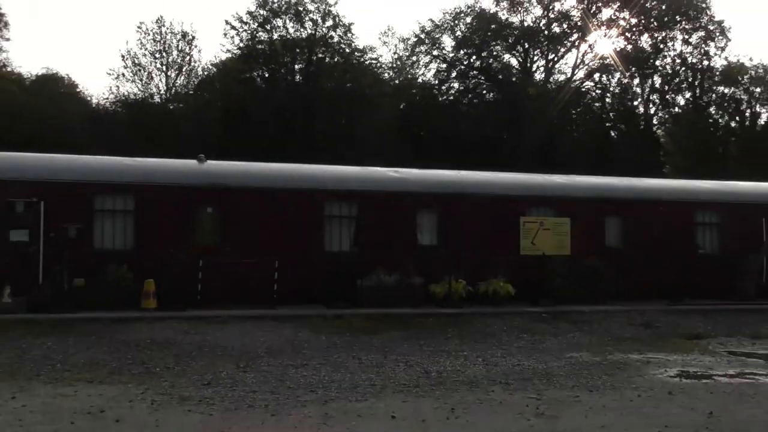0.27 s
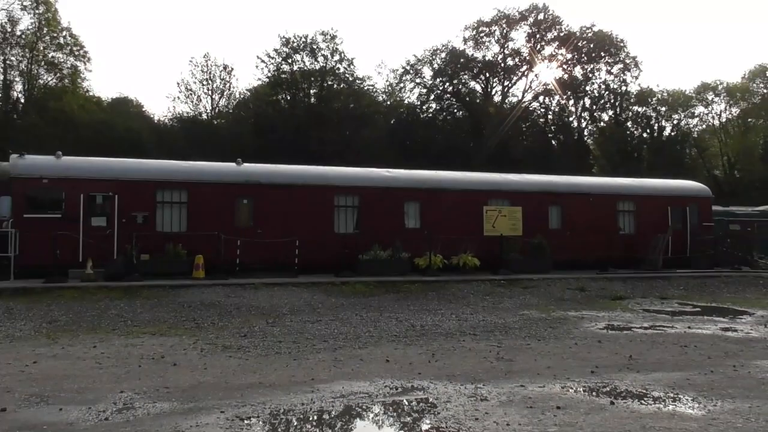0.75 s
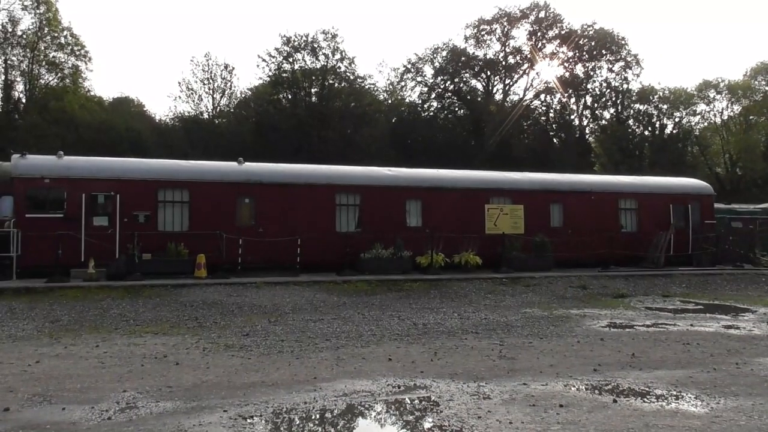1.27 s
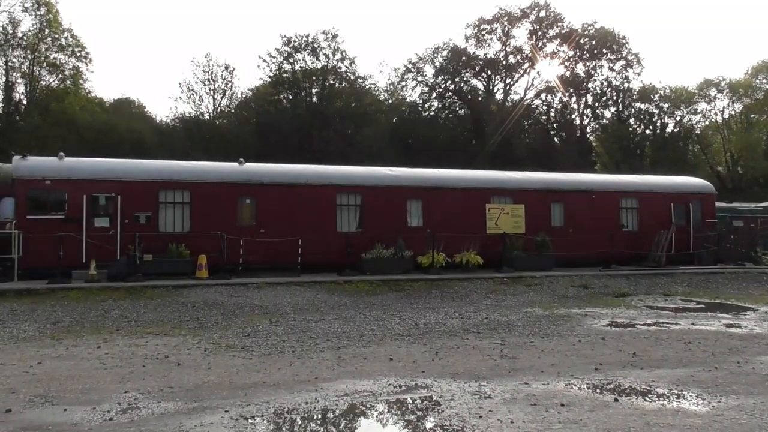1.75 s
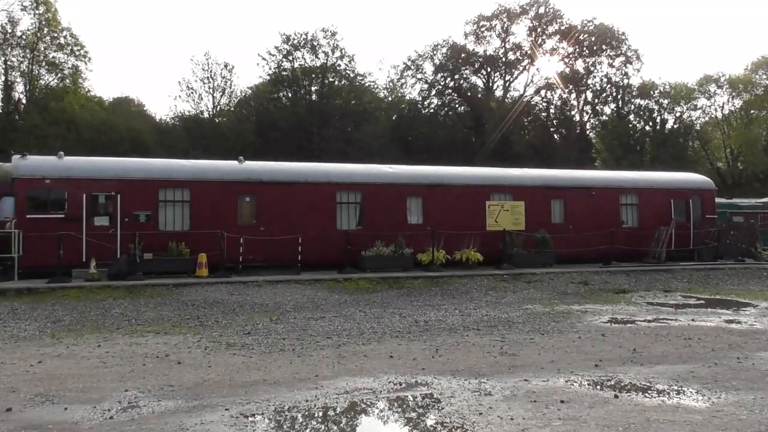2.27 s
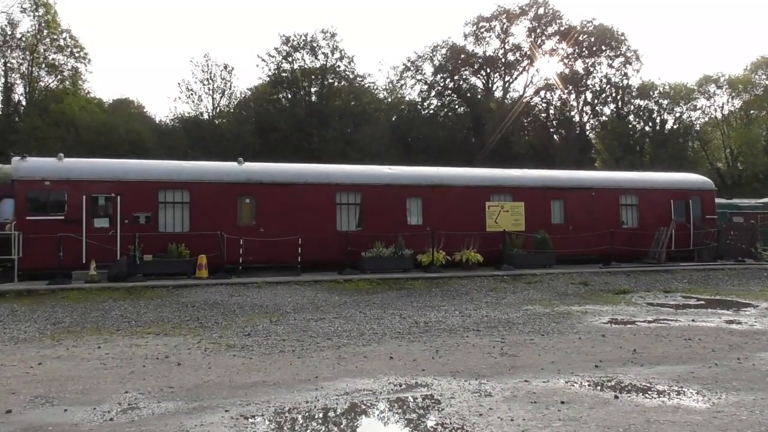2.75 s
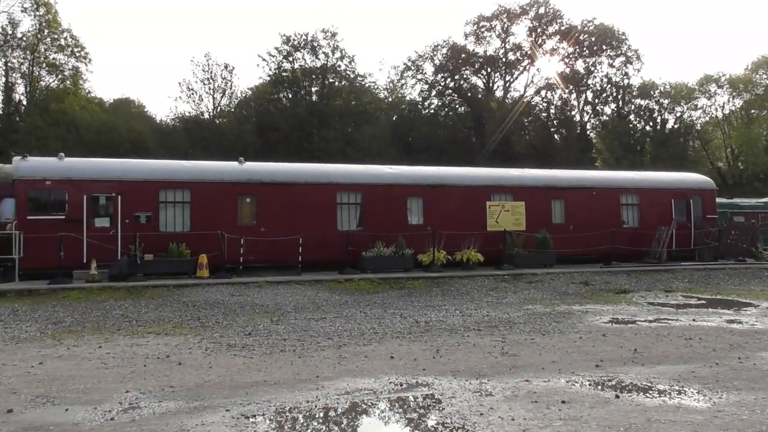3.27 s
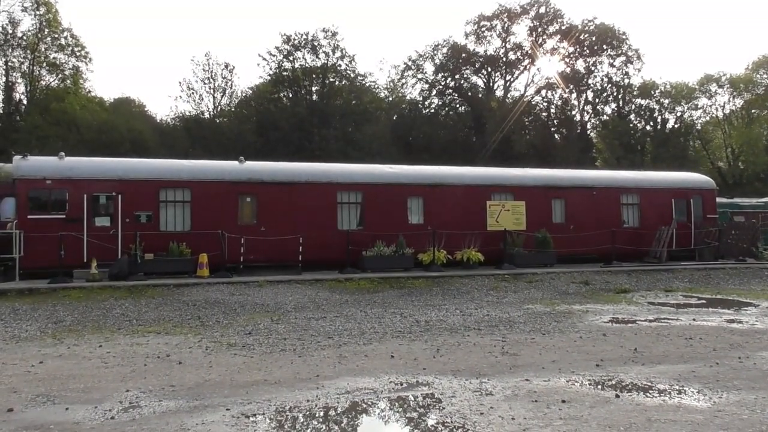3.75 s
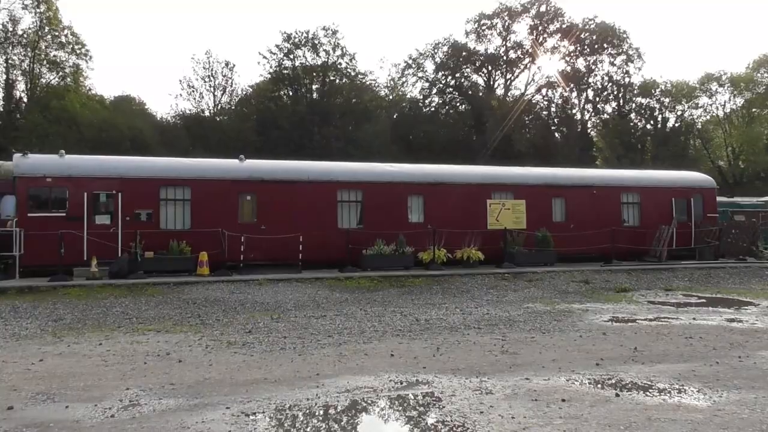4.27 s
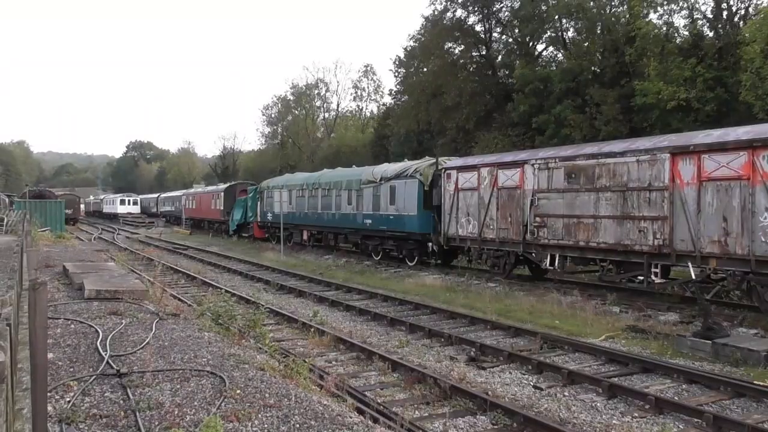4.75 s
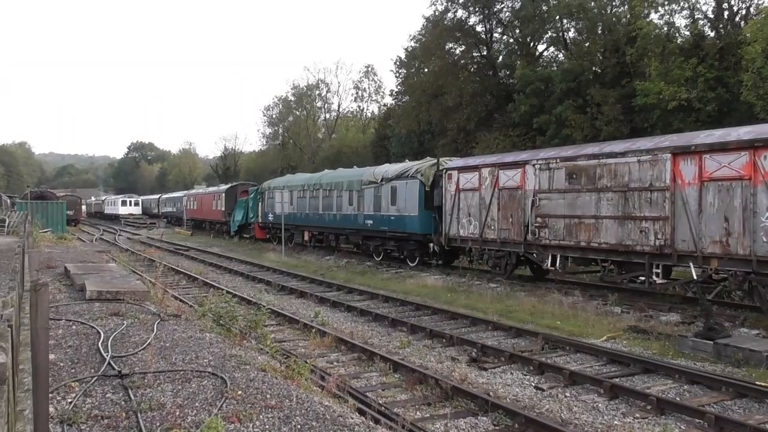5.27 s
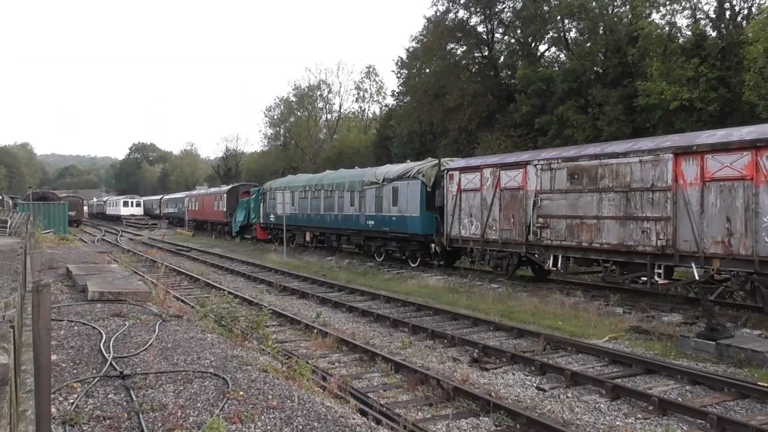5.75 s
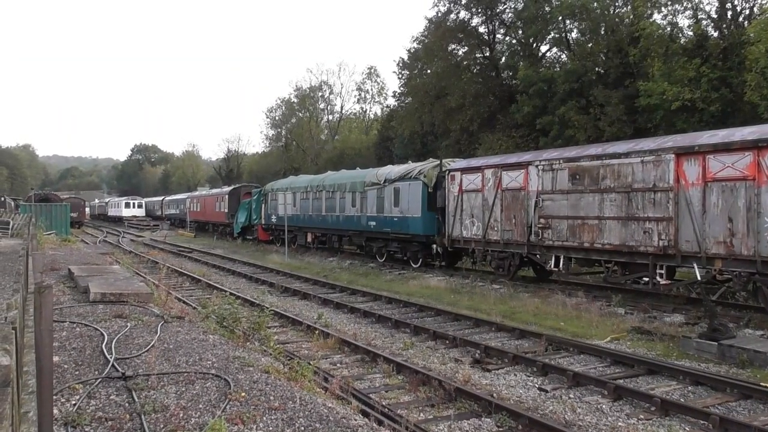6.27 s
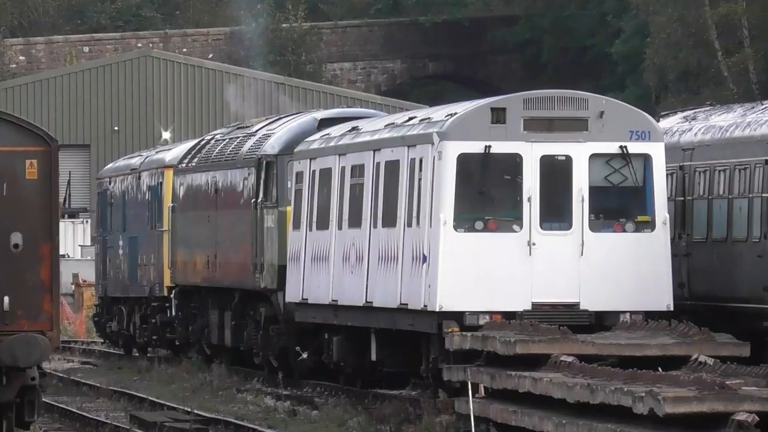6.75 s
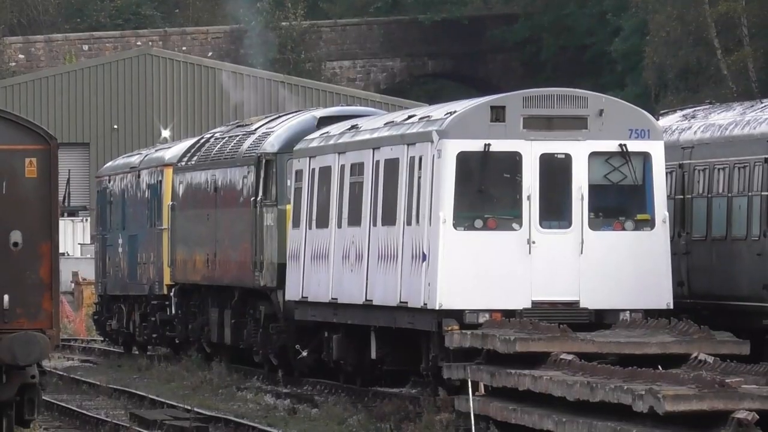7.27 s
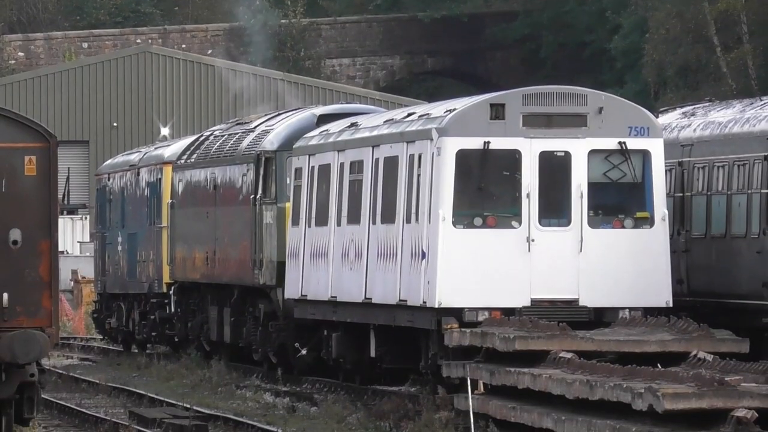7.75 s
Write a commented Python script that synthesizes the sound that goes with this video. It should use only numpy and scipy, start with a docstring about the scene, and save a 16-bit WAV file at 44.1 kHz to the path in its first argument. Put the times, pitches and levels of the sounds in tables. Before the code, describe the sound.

A large jet rumbles high over a railway yard while songbirds whistle and buzz, then cuts out to leave birdsong and faint distant traffic.

```python
"""A large jet rumbles high over a railway yard by a wood while songbirds whistle, warble and buzz in the trees.
Ticks sound under the jet; two cuts lead to quieter spots with birds, far traffic and a faint idling drone.
The jet is shaped noise combed by its ground echo; birds are bent sines and fast sweeps with echo and wood tail;
air and swells are band noise; the drone is two sines; ticks are short rings. Hiss lies over all."""
import sys
import numpy as np
from scipy import signal
from scipy.fft import rfft, irfft
from scipy.io import wavfile
from scipy.ndimage import uniform_filter1d

SR = 44100
rng = np.random.default_rng(int(sys.argv[2]) if len(sys.argv) > 2 else 0)


def wav_out(sig):
    """Save sig, one row per channel (or a flat mono array), as 16-bit PCM at SR to the path in sys.argv[1]."""
    wavfile.write(sys.argv[1], SR, np.round(np.clip(np.atleast_2d(sig).T, -1, 1) * 32767).astype(np.int16))


N = 352800
T = np.arange(N) / SR
BIN_HZ = np.fft.rfftfreq(N, 1 / SR)
OPPOSITE = np.array([[1], [-1]])  # left, right

# listening spots: start t/s, end t/s
SPOTS = [(0, 4.3843), (4.3963, 6.787), (6.787, 8)]


def undb(db):
    """Amplitude factor of a dB value."""
    return 10 ** (np.asarray(db) / 20)


def level(x, db):
    """Scale to an RMS level, all channels together."""
    return x * undb(db) / np.sqrt(np.mean(x ** 2))


def on_hz(table):
    """Read an (f/Hz, value) table at every spectrum bin, on a log frequency axis."""
    hz, value = np.transpose(table)
    return np.interp(np.log(BIN_HZ + 1), np.log(hz), value)


def noise(gain):
    """White noise with the given gain at every spectrum bin."""
    return irfft(rfft(rng.standard_normal(N)) * gain, N)


def hump(hz, width_hz):
    """Flat-topped band, width_hz between its 1/e gain points."""
    return np.exp(-(2 * (BIN_HZ - hz) / width_hz) ** 4)


def walk(rate_hz):
    """Random levels held 1 / rate_hz and smoothed twice; spread somewhat below 1."""
    k = int(SR / rate_hz)
    held = np.repeat(rng.standard_normal(N // k + 1), k)
    return uniform_filter1d(uniform_filter1d(held, k), k)[:N]


def shiver(count, size):
    """Noise smoothed twice over size samples; spread about 1."""
    smooth = uniform_filter1d(uniform_filter1d(rng.standard_normal(count), size), size)
    return np.sqrt(1.5 * size) * smooth


def gate(start_s, end_s, edge_s=.001):
    """1 between two times, with linear edges inside them."""
    return np.clip(np.minimum(T - start_s, end_s - T) / edge_s, 0, 1)


def per_spot(values):
    """Hold one value through each spot."""
    return np.select([T < stop for _, stop in SPOTS], values)


def next_cut(s):
    """End of the spot that holds or follows a time."""
    return min(stop for _, stop in SPOTS if stop > s)


def spot_gain(k):
    """A spot plays between its cuts; a brief faint swell sounds in the gap before the second."""
    swell_end_s, edge_s = 4.3937, .0003
    gap_start, gap_end = SPOTS[0][1], SPOTS[1][0]
    swell = ((T - gap_start) / (gap_end - gap_start)) ** 2 * gate(gap_start, swell_end_s, edge_s)
    return gate(*SPOTS[k], edge_s) + (k == 1) * swell


def add(out, start_s, x, pan_db):
    """Mix a short sound in at a time; pan_db is left minus right."""
    i = int(start_s * SR)
    out[:, i:i + len(x)] += undb(pan_db / 2 * OPPOSITE) * x[:N - i]


def air(k):
    """Air, far traffic and blurred far birds: a slowly drifting wash, narrow at 2.6-6.7 kHz, wide above 7.3 kHz."""
    # one spectrum per spot: f/Hz, relative level/dB per Hz
    spectra = [
        [(260, -26), (450, -2.5), (545, -6.5), (980, -8), (1460, -20.5), (2110, -20.5), (3010, -25.5),
         (4140, -26.5), (5220, -29.5), (6000, -24), (8050, -29), (9500, -41), (12400, -62), (20900, -120)],
        [(15, -18), (25, -7.5), (71, 2), (212, -3), (532, -13.5), (772, -10.5), (1710, -32), (1980, -30),
         (2880, -39.5), (3690, -37.5), (4860, -38.5), (7980, -32.5), (9500, -51), (12400, -41.5), (20900, -120)],
        [(15, -28), (25, 1), (146, 1.5), (532, -10), (587, -11), (649, -9.5), (896, -11), (1710, -33),
         (2030, -27.5), (2740, -34), (4080, -35.5), (4860, -32), (9500, -36), (12400, -51), (20900, -120)],
    ]
    # wash level per spot: level/dB
    wash_db = [-56.5, -49.5, -50]
    # stereo width: f/Hz, side minus mid/dB
    side_db = [(60, -12), (200, -9), (400, -6.5), (1000, -7), (1800, -12.5), (2600, -26), (6700, -36),
               (7300, -4)]
    # balance of the mid part: f/Hz, left minus right/dB
    balance_db = [(60, 2), (400, 1.5), (1300, 0.5), (2400, 0.7), (8000, 3.5)]
    colour, pan = undb(on_hz(spectra[k])), undb(on_hz(balance_db) / 2)
    mid = rfft(noise(colour))
    side = rfft(noise(colour * undb(on_hz(side_db))))
    sides = irfft(np.array([mid * pan + side, mid / pan - side]), N)
    return level(sides, wash_db[k]) * undb(.6 * walk(3))


def drone():
    """Far idling engine: an unsteady low hum that swells and dies back, and one thin, nearly steady tone."""
    # hum: t/s, level/dB
    hum_db = [(4.4, -57), (4.75, -63), (5.45, -53), (5.6, -66), (6.1, -59), (6.8, -64), (8, -70)]
    # tone per spot: level/dB
    tone_db = [-73, -69, -63]
    hum_hz, tone_hz = 46.2 + 2.49 * walk(9.2), 596 + 1.52 * walk(4)
    hum = np.sqrt(2) * np.sin(2 * np.pi * np.cumsum(hum_hz) / SR)
    hum *= undb(np.interp(T, *np.transpose(hum_db), left=-120))
    tone = np.sqrt(2) * np.sin(2 * np.pi * np.cumsum(tone_hz) / SR) * undb(per_spot(tone_db))
    return undb(1.1 * OPPOSITE) * (hum + tone)


def swells():
    """Soft bands of noise that fade, flicker and end with their spot."""
    # start t/s, end t/s, centre f/Hz, width/Hz, level/dB before fades and flicker
    swell_rows = [(0, 1.5, 41, 37, -54.5), (3, 4.5, 2010, 470, -76), (0, 0.52, 7200, 3500, -65.5),
                  (0.35, 0.48, 1500, 2300, -64), (2, 2.36, 3700, 2700, -67), (5.95, 6.5, 2600, 1700, -69.5),
                  (6.5, 7, 2570, 2100, -68.5), (5.5, 6.3, 4070, 1200, -73), (6.64, 6.9, 3800, 1728, -65)]
    out = np.zeros((2, N))
    for start, end, hz, width_hz, db in swell_rows:
        band = hump(hz, width_hz)
        flicker = undb(3 * walk(45))
        sides = level(noise(band) + 0.12 * noise(band) * OPPOSITE, db)
        out += sides * gate(start, end, 0.14) * flicker * (T < next_cut(start))
    return out


def ticks():
    """Small near ticks: a noise crack and three dull modes ringing a few milliseconds."""
    # t/s, level/dB before the envelope, share of the higher ring 0-1
    tick_rows = [(0.045, -43, 0.2), (.129, -46, 0.5), (.279, -53, 0.7), (0.523, -42.5, 0.2),
                 (1.729, -42, 0.05), (2.917, -47.5, .8), (3.313, -53, .8), (3.379, -51, .8),
                 (3.434, -50.5, .8), (3.497, -51, 1), (3.625, -50.5, 1), (3.689, -48, 1)]
    mode_hz, mode_spread = np.array([966, 1680, 2120]), 0.044
    out, t = np.zeros((2, N)), np.arange(int(.04 * SR)) / SR
    envelope = (1 - np.exp(-t / 0.00061)) * np.exp(-t / 0.0051)
    for s, db, share in tick_rows:
        hz = mode_hz * (1 + mode_spread * rng.standard_normal(len(mode_hz)))
        low, middle, high = np.sin(2 * np.pi * np.outer(hz, t))
        crack = 1.7 * uniform_filter1d(rng.standard_normal(len(t)), size=10) * np.exp(-t / 0.0072)
        ring = (1 - share) * low + share * (high + 0.45 * middle)
        add(out, s, undb(db) * (ring + crack) * envelope, -1.1)
    return out


def wood(x):
    """Trunks and leaves scatter a call into a short diffuse tail, wide in stereo only above 6.9 kHz."""
    t60_s, onset_s, wide_from_hz = 0.7, 0.015, 6900
    t = np.arange(int(.8 * SR)) / SR
    high_pass = signal.butter(8, wide_from_hz, "high", fs=SR, output="sos")
    wide = signal.sosfilt(high_pass, rng.standard_normal((2, len(t))))
    decay = np.exp(-np.log(1000) * t / t60_s) * np.clip(t / onset_s, 0, 1)
    tail = (rng.standard_normal(len(t)) + 0.79 * wide) * decay
    return signal.fftconvolve(x, tail / np.sqrt(np.sum(tail ** 2) / 2), axes=1)[:, :N]


def whistle(out, start_s, length_s, path_hz, db, pan_db, wobble_hz=0.):
    """Sine bent through three pitches, loudest mid-way; air and leaves flutter it; a warble saws its pitch."""
    edge_s, ends_db, warble_rate_hz = 0.00061, -5, 40
    flutter_db, flutter_hz = 4.6, 40
    clear_db, steady_s = -59, .06  # louder or longer-held notes flutter less
    t = np.arange(0, length_s, 1 / SR)
    u = 2 * t / length_s - 1  # -1 to 1 along the note
    first, mid, last = path_hz
    pitch = mid + (last - first) / 2 * u + ((first + last) / 2 - mid) * u ** 2
    pitch += wobble_hz * (1 - 0.65 * u) * (1 - 2 * (t * warble_rate_hz % 1))
    far = np.clip((clear_db - db) / 6, .35, 1)  # faint notes are far ones
    flutter = far * min(steady_s / length_s, 1) ** .45
    pitch += flutter * flutter_hz * shiver(len(t), size=150)
    fade = np.clip(np.minimum(t, length_s - t) / edge_s, 0, 1)
    gain = undb(db + ends_db * u ** 2 + flutter * flutter_db * shiver(len(t), size=170))
    add(out, start_s, np.sqrt(2) * fade * gain * np.sin(2 * np.pi * np.cumsum(pitch) / SR), pan_db)


def buzz(out, start_s, length_s, low_hz, high_hz, rate_hz, db, pan_db):
    """Falling sweeps, boosted at the throat's ring: fast and uneven ones rasp, slow ones trill evenly."""
    attack_s, release_s, sag_db = 0.0076, 0.016, -5.5
    throat_hz, throat_db = 6800, 2
    t = np.arange(0, length_s, 1 / SR)
    sweep_hz = rate_hz * (1 + rate_hz / 400 * shiver(len(t), size=200))
    phase = np.cumsum(sweep_hz) / SR % 1
    pitch = high_hz + (low_hz - high_hz) * phase ** 1.1
    pitch += 1.5 * rate_hz * shiver(len(t), size=40)
    shape = np.clip(np.minimum(t / attack_s, (length_s - t) / release_s), 0, 1)
    shape *= undb(sag_db * t / length_s) * np.sin(np.pi * phase) ** 0.087
    shape *= undb(1.9 * shiver(len(t), size=100))
    shape *= undb(throat_db * np.exp(-((pitch - throat_hz) / 500) ** 2))
    add(out, start_s, np.sqrt(2) * undb(db) * shape * np.sin(2 * np.pi * np.cumsum(pitch) / SR), pan_db)


def far_chorus():
    """Quick random chirps of far birds; low voices hold their notes, high ones bend and clip them."""
    # t/s, level/dB, middle pitch f/Hz
    chorus_rows = [(0, -66, 4160), (.35, -78, 4220), (.9, -72, 4110), (1.15, -73.5, 4110),
                   (1.65, -79, 4145), (1.9, -69, 4170), (2.6, -85, 4010), (3.3, -78, 4100),
                   (4.38, -76, 4090), (4.4, -68, 4310), (5.5, -67.5, 4100), (5.95, -77, 3640),
                   (6.03, -71, 2604), (6.4, -76, 2646), (6.5, -73.5, 3000), (6.78, -74, 3610),
                   (6.79, -67, 4200), (7.3, -70, 4105), (7.42, -86, 4130), (7.6, -79, 4160), (8, -73, 4220)]
    spread, bend = .25, 0.2826  # shares of the pitch
    held_hz = 3200
    far = np.zeros((2, N))
    times, chorus_db, chorus_hz = np.transpose(chorus_rows)
    for when, long, high, rise, fall, loud, side in rng.random((480, 7)):
        s = when * (N / SR - .05)
        hz = np.interp(s, times, chorus_hz) * (1 + spread * (high - .5))
        lively = np.clip((hz - held_hz) / 800, .1, 1)
        length_s = (.014 + .03 * long ** 2) * (2.5 - 1.5 * lively)
        length_s = min(length_s, next_cut(s) - s + .004)
        path_hz = hz * (1 - lively * bend * np.array([rise, 0, fall]))
        whistle(far, s, length_s, path_hz, -70 + 8 * loud, 1 - 2 * side)
    return level(far, 0) * undb(np.interp(T, times, chorus_db))


def couplets(out):
    """Two falling slurs, the low one first."""
    # start t/s, low slur level/dB, high slur level/dB
    couplet_rows = [(1.748, -66, -64), (1.852, -68, -65.5), (1.96, -67, -64.5), (2.062, -72, -65)]
    low_hz, high_hz = [2790, 2600, 2360], [5000, 4400, 3750]
    slur_s, gap_s, pan_db = 0.026, 0.025, -3  # gap from start to start
    for s, low_db, high_db in couplet_rows:
        whistle(out, s, slur_s, low_hz, low_db, pan_db)
        whistle(out, s + gap_s, slur_s, high_hz, high_db, pan_db)


def hooks(out):
    """Whistles that leap up and hold."""
    # start t/s, hold plus half the leap/s, top f/Hz, level/dB, left minus right/dB
    hook_rows = [(4.84, 0.019, 4100, -72, -9), (5.724, 0.018, 3990, -59, 2), (5.791, 0.011, 4020, -59, 2),
                 (5.859, 0.019, 3970, -55, -3.5), (7.492, .02, 4250, -72, 3),
                 (7.562, 0.023, 4080, -66.5, 1), (7.624, 0.0335, 4100, -66, 2),
                 (7.695, 0.031, 4060, -67, -1.5), (7.942, 0.032, 4370, -66, 2)]
    leap_hz, leap_s = 754, 0.0071
    for s, length_s, top_hz, db, pan_db in hook_rows:
        whistle(out, s, leap_s, top_hz - leap_hz * np.array([1, .35, 0]), db, pan_db)
        whistle(out, s + leap_s, length_s - leap_s / 2, [top_hz] * 3, db, pan_db)


def rasps(out):
    """A rasping call in two equal buzzes."""
    # start t/s, time to the second buzz/s, level/dB before shaping
    rasp_rows = [(.738, 0.077, -59), (1.219, 0.091, -69), (2.263, 0.073, -58), (2.841, 0.073, -63),
                 (3.168, 0.076, -62), (3.422, 0.076, -63.5)]
    length_s, low_hz, high_hz, rate_hz, pan_db = 0.075, 5900, 7500, 200, -1
    for s, wait_s, db in rasp_rows:
        for start_s in (s, s + wait_s):
            buzz(out, start_s, length_s, low_hz, high_hz, rate_hz, db, pan_db)


def near_birds():
    """All near calls, each with one early echo off the side of a carriage."""
    # start t/s, length/s, start f/Hz, middle f/Hz, end f/Hz, mid-note level/dB, left minus right/dB
    note_rows = [(.2, .08, 8000, 7800, 7400, -74, -5), (.285, 0.09, 7200, 6990, 6800, -69, 0),
                 (.344, 0.02, 3800, 4500, 5400, -60, -3), (.362, .016, 5220, 4750, 4340, -64, -3),
                 (.375, 0.048, 4070, 4075, 4020, -60, -5), (.392, 0.031, 4480, 4310, 4160, -63, -3),
                 (.427, 0.014, 4050, 3580, 3150, -57, -4), (.46, 0.084, 6740, 6730, 6660, -67, -1),
                 (.515, 0.015, 3200, 3650, 4050, -54.5, -5), (.541, 0.032, 3850, 3650, 3280, -54, -4),
                 (.527, .009, 4100, 4500, 4900, -62, -5), (.575, .017, 3850, 4000, 4240, -58, -5),
                 (.591, 0.012, 4100, 3600, 3130, -56, -4), (.626, 0.0087, 4300, 4480, 4500, -55, -3),
                 (.654, 0.027, 4800, 4200, 4070, -59.5, -4), (.678, 0.017, 3400, 4110, 4750, -53.5, -4),
                 (.699, .03, 4300, 4500, 4480, -59, -3), (.706, 0.039, 3600, 3510, 3380, -61, -4),
                 (.771, .01, 4030, 4440, 4900, -63, 0), (.782, .01, 4900, 5300, 5700, -68, -2),
                 (.8, 0.015, 4800, 4470, 4170, -61.5, -3), (.868, .016, 4500, 4350, 4150, -68, -1),
                 (.865, .015, 3700, 3640, 3520, -69, -3), (1.021, 0.061, 3900, 3830, 3750, -68, -1),
                 (1.631, 0.013, 2460, 2360, 2300, -65, -4), (1.643, 0.013, 3430, 4200, 4960, -65, -3),
                 (1.6, .027, 8120, 8010, 7900, -71.5, 6), (1.655, .135, 5830, 5810, 5790, -73.5, 1),
                 (1.775, .025, 7400, 7150, 6900, -68, 4), (1.95, .16, 8800, 8720, 8660, -78, 10),
                 (1.752, 0.027, 7030, 8160, 8600, -68, 5), (2.178, 0.02, 2560, 2435, 2280, -66, -6),
                 (2.202, 0.025, 4380, 4200, 3930, -61, 2), (2.232, 0.033, 4210, 4060, 3900, -59.5, 2),
                 (2.258, 0.047, 3900, 3080, 2600, -65, 3), (2.38, .015, 3400, 3480, 3560, -67, 5),
                 (2.395, .055, 3500, 2900, 2660, -73, 4), (2.53, 0.16, 3490, 3570, 3620, -72.5, -1),
                 (2.948, 0.043, 4230, 4190, 4200, -68, 0.5), (3.774, 0.11, 3940, 4050, 4200, -72.5, -2),
                 (4.02, 0.04, 5660, 5080, 5000, -68.5, -1), (4.111, 0.043, 5650, 5090, 5100, -64, 0),
                 (4.24, 0.083, 2060, 2045, 2030, -69, -1), (4.414, 0.062, 4640, 4140, 3900, -56, -4),
                 (4.479, .085, 5820, 5310, 5270, -65, -4), (4.484, .03, 6200, 6150, 6100, -64, -2),
                 (4.544, 0.049, 3170, 4530, 4800, -61.5, -5), (4.635, 0.051, 5000, 5070, 5100, -61, 0),
                 (4.679, 0.022, 5030, 3520, 5100, -59, -7), (4.702, 0.022, 5100, 5070, 5120, -58, -2),
                 (4.787, .009, 6400, 6300, 6250, -59, -1), (4.806, 0.0095, 6330, 6150, 5850, -60, -1),
                 (4.848, .012, 6270, 6270, 6300, -54, 0), (4.872, 0.0085, 6400, 6200, 5950, -57, -2),
                 (4.92, 0.0093, 3530, 3800, 4100, -62, -4), (4.929, 0.023, 3490, 4840, 3550, -56.5, -3.5),
                 (4.968, 0.044, 3950, 4230, 4480, -66, 2), (5.002, .02, 3270, 3760, 4200, -62, -4),
                 (5.023, 0.108, 2950, 4380, 3140, -57.5, -3.5), (5.228, 0.015, 4460, 4020, 3470, -59, -6),
                 (5.28, .012, 6760, 6130, 5440, -61, -6), (5.303, .035, 3700, 3900, 3620, -73, -3),
                 (5.33, .03, 4460, 4700, 4270, -72, 0), (5.386, .018, 3450, 4350, 4660, -58, -4),
                 (5.404, 0.03, 4660, 4350, 2960, -57, -5), (5.456, 0.094, 4080, 4125, 4150, -63.5, -3),
                 (5.436, .024, 2700, 3500, 3100, -70, -6), (5.48, 0.2, 5300, 5170, 5080, -69, 0),
                 (5.6, 0.07, 3240, 3130, 3050, -75, -9), (5.689, 0.062, 3240, 3290, 3300, -62.5, -6.5),
                 (5.918, 0.062, 2910, 2980, 2980, -70.5, -4), (5.946, 0.025, 6680, 6400, 6130, -67, 0),
                 (5.997, 0.029, 6900, 6500, 6100, -66, -3), (6.015, .03, 4180, 4170, 4100, -71, -2),
                 (6.024, .06, 2525, 2460, 2410, -68, -7), (6.104, 0.032, 4860, 4920, 4980, -68, -3),
                 (5.985, 0.096, 2900, 2860, 2800, -69, -5), (6.13, 0.026, 4600, 3720, 3500, -63, -4),
                 (6.171, 0.026, 3450, 4160, 4450, -57.5, -2.5), (6.193, .01, 4400, 3800, 3200, -65, -3),
                 (6.246, 0.11, 2400, 2380, 2430, -67.5, -5), (6.425, .035, 2400, 2450, 2420, -73, -2),
                 (6.455, .014, 3150, 3220, 3180, -66, -4), (6.462, .025, 2880, 2870, 2820, -74, -4),
                 (6.505, .045, 3300, 3310, 3180, -64, -6), (6.615, 0.017, 3350, 3250, 3150, -69, -6),
                 (6.655, .023, 3280, 3260, 3200, -66, -8), (6.678, .014, 2900, 2770, 2750, -66, -6),
                 (6.535, 0.038, 3600, 3580, 3550, -72, -5), (6.667, .02, 3700, 3800, 3900, -70, -5),
                 (6.79, 0.043, 4800, 4750, 4660, -67, -2), (6.815, 0.019, 4080, 4280, 4400, -63, 3),
                 (6.859, 0.02, 4500, 4200, 3830, -62.5, 1.5), (6.84, .14, 4450, 4530, 4430, -66.5, 0),
                 (6.844, .012, 3550, 3770, 3950, -67, -1), (6.877, .03, 3700, 3370, 3080, -70, 4),
                 (6.895, .035, 7340, 7360, 7380, -69, 1), (6.925, 0.03, 4550, 4150, 3550, -64, -3),
                 (6.96, 0.023, 3350, 3170, 3050, -73, -6), (6.942, 0.097, 7460, 7440, 7500, -72, -6),
                 (6.978, .02, 4560, 4380, 4000, -68.5, -1), (6.983, .025, 5560, 5550, 5600, -70.5, 0),
                 (7.002, .018, 4500, 4250, 3870, -66, 0), (7.076, 0.011, 4350, 4140, 3550, -68, -3),
                 (7.117, .01, 4700, 4900, 5130, -65, -3), (7.152, .01, 4150, 4250, 4350, -69, -1),
                 (7.168, .01, 4200, 4300, 4400, -66, -1), (7.194, 0.011, 4380, 4260, 4250, -63, 2),
                 (7.252, 0.029, 4600, 4400, 3600, -69, -2.5), (7.218, .018, 3200, 3520, 3480, -70, -5),
                 (7.29, 0.02, 3400, 3490, 3430, -68, -5), (7.302, .03, 5900, 5680, 5470, -68, 0),
                 (7.317, .011, 4150, 4220, 4400, -68, 2), (7.32, 0.056, 5200, 5100, 5150, -71, -2),
                 (7.37, 0.12, 5240, 5080, 4940, -57, -5), (7.215, 0.028, 4460, 4650, 4900, -66, -2),
                 (7.755, 0.031, 4250, 4150, 4000, -77, -2), (7.77, 0.038, 6330, 6060, 5860, -67, 2),
                 (7.831, 0.031, 6420, 6070, 5730, -70, 1), (7.88, 0.13, 5000, 4980, 4930, -71, 0),
                 (7.902, .015, 4360, 4290, 4240, -72, -2), (7.975, .02, 3860, 3710, 3600, -68, -4)]
    # climbing warbles: start t/s, length/s, start f/Hz, middle f/Hz, end f/Hz, mid-note level/dB
    warble_rows = [(2.055, 0.11, 7380, 7670, 8080, -63), (2.433, 0.13, 7150, 7580, 8030, -61.5),
                   (2.652, 0.15, 7290, 7820, 8100, -61.5), (2.921, 0.21, 7230, 7960, 8050, -61)]
    # start t/s, length/s, low f/Hz, high f/Hz, sweep rate/Hz, level/dB before shaping, left minus right/dB
    buzz_rows = [(1.799, 0.29, 5900, 7500, 160, -72, 0), (4.388, 0.11, 6700, 7760, 120, -60.5, 3),
                 (4.548, 0.083, 5850, 8200, 160, -57.5, 1), (4.574, 0.23, 6900, 8880, 24, -60.5, 15),
                 (4.625, 0.2, 6730, 8210, 160, -53.5, 1), (4.807, 0.087, 5960, 7930, 150, -61, -3),
                 (5.233, 0.13, 5730, 7500, 165, -58, 1), (5.24, .11, 7600, 8180, 180, -65, -7),
                 (5.368, 0.21, 5700, 8560, 190, -61, -2), (5.591, 0.14, 5730, 8340, 190, -61.5, -1),
                 (7.063, 0.08, 5620, 7200, 160, -64, 3), (7.141, .09, 6030, 7140, 130, -66, -2)]
    warble_pan_db, warble_hz = 3.5, 161  # pitch swing mid-note
    echo_s, echo_db = .011, [-6, -17, -9]  # echo level per spot
    near = np.zeros((2, N))
    for s, length_s, *path_hz, db, pan_db in note_rows:
        whistle(near, s, length_s, path_hz, db, pan_db)
    couplets(near)
    hooks(near)
    for s, length_s, *path_hz, db in warble_rows:
        whistle(near, s, length_s, path_hz, db, warble_pan_db, warble_hz)
    rasps(near)
    for row in buzz_rows:
        buzz(near, *row)
    lag = int(echo_s * SR)
    near[:, lag:] += undb(per_spot(echo_db))[lag:] * near[:, :-lag]
    return near


def jet():
    """Mixing noise, its treble lost on the long way down, combed by the ground echo; turbulent air surges it."""
    # t/s, overall level/dB, deep rumble gain/dB
    jet_rows = [(0, -40, -9), (.5, -39, -12), (1, -38, -11.5), (1.5, -39, -5.5), (2, -37, -6),
                (2.4, -34.5, -10), (2.8, -38.5, 1), (3.2, -35.5, -4.5), (3.6, -36, -3.5), (4, -34, -3.5),
                (4.38, -37.5, -2)]
    # f/Hz, relative level/dB per Hz
    roar_spectrum = [(20, -26), (40, -14), (80, -1), (150, 1), (230, -2.5), (330, -7), (440, -15.5),
                     (520, -23), (700, -61)]
    ground_s, ground_share, split_hz = 0.00462, 0.41, 104
    s, roar_db, deep_db = np.transpose(jet_rows)
    ground_comb = 1 + ground_share * np.exp(-2j * np.pi * BIN_HZ * ground_s)
    colour = undb(on_hz(roar_spectrum)) * ground_comb
    deep = 1 / (1 + (BIN_HZ / split_hz) ** 8)
    roar = level(noise(colour * (1 - deep)), 0) * undb(1.5 * walk(6.43))
    fan = level(noise(hump(81, 12)), -8)
    rumble = (level(noise(colour * deep), -2.7) + fan) * undb(np.interp(T, s, deep_db))
    scattered = level(noise(colour * (.5 + deep)), -19)  # off walls, opposite on the two sides
    sides = undb(np.array([[1.4], [-1.5]])) * (roar + rumble) + OPPOSITE * scattered
    return sides * undb(np.interp(T, s, roar_db))


def scene():
    """Three spots in turn, the jet and ticks in the first only, soft swells in the first two."""
    wood_db = -5.5
    near, far, out = near_birds(), far_chorus(), 0
    idling = drone()
    steady = [jet() + idling, idling, idling]
    for k in range(len(SPOTS)):
        gain = spot_gain(k)
        close, distant = near * gain, far * gain
        sung = close + distant + wood(undb(wood_db) * close + 0.58 * distant)
        out = out + gain * (sung + air(k) + steady[k])
    return out + swells() + ticks()


def record(dry):
    """Hiss lies over all, nearly the same left and right at 2.6-6.7 kHz, wide above; the top is cut."""
    # shared hiss: f/Hz, relative level/dB per Hz
    hiss_spectrum = [(1500, -0.5), (5200, -46), (6500, -3.5), (9000, 2.5), (15000, 1)]
    # separate hiss of each channel: f/Hz, separate minus shared/dB
    separate_db = [(1500, -8), (2600, -26), (6700, -30), (7300, 4), (15000, 5.5)]
    hiss_db, top_hz = -67.5, 15800
    shared = undb(on_hz(hiss_spectrum))
    separate = np.array([noise(shared * undb(on_hz(separate_db))) for _ in range(2)])
    hiss = level(noise(shared) + separate, hiss_db)
    hiss *= 1 - .6 * gate(SPOTS[0][1], SPOTS[1][0])  # dips between the first two spots
    low_pass = signal.ellip(10, .2, 70, top_hz, fs=SR, output="sos")
    return signal.sosfilt(low_pass, dry + hiss)


dry = scene()
out = record(dry)
wav_out(out)
```